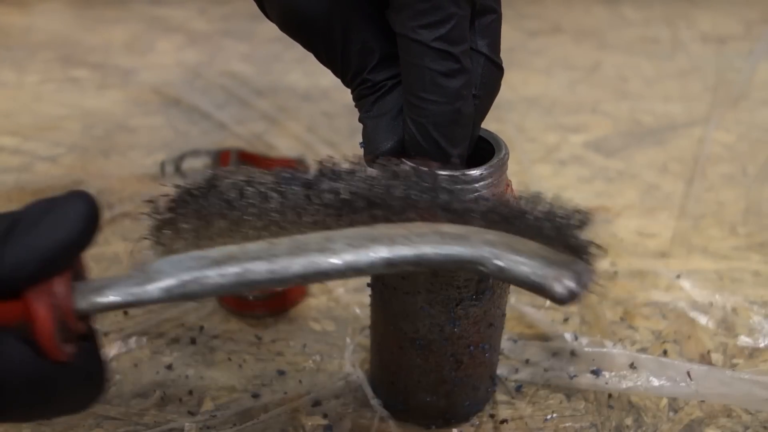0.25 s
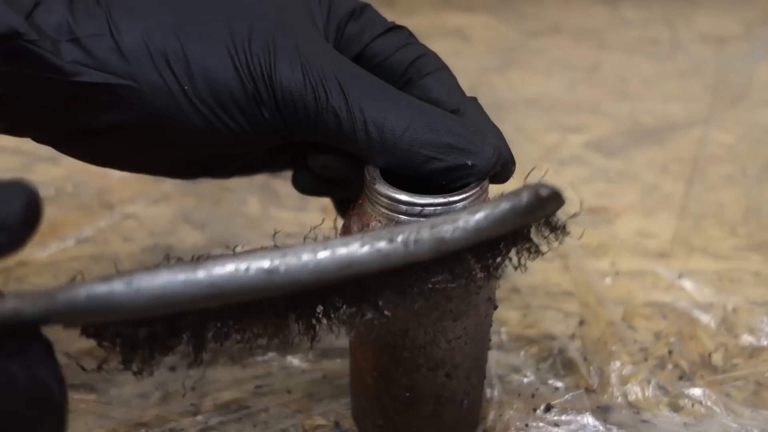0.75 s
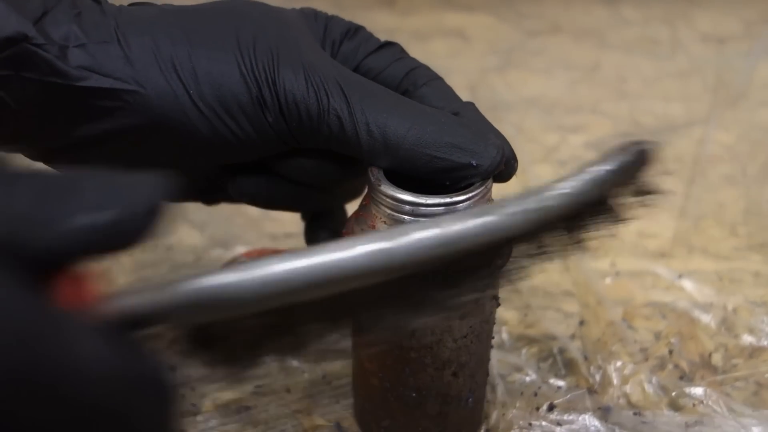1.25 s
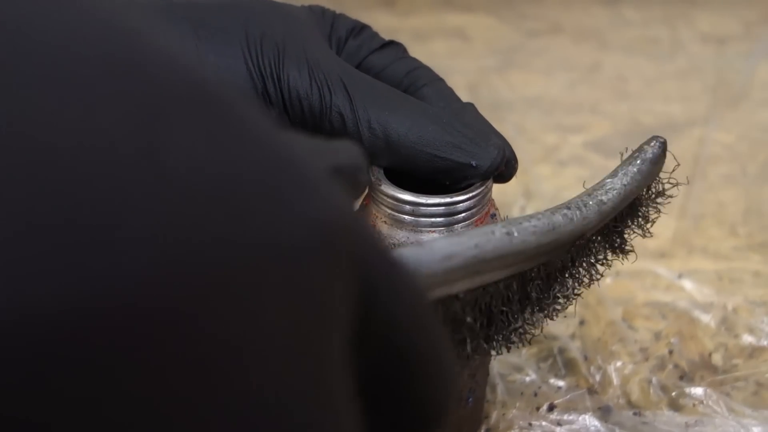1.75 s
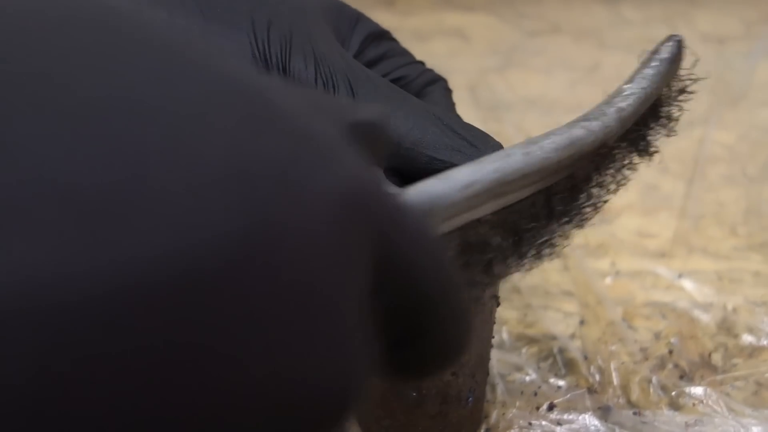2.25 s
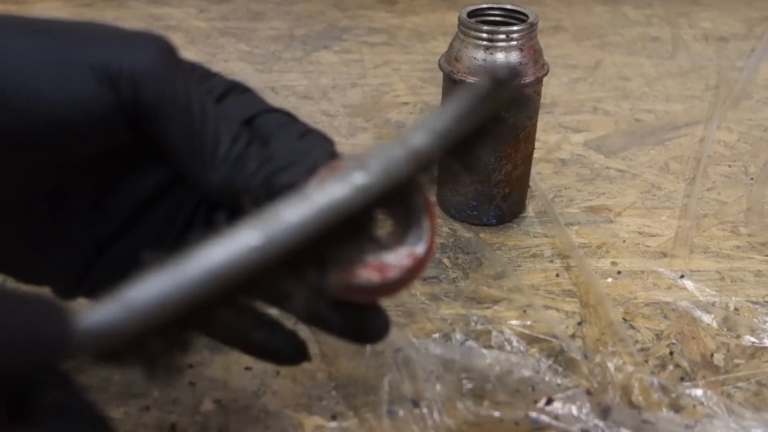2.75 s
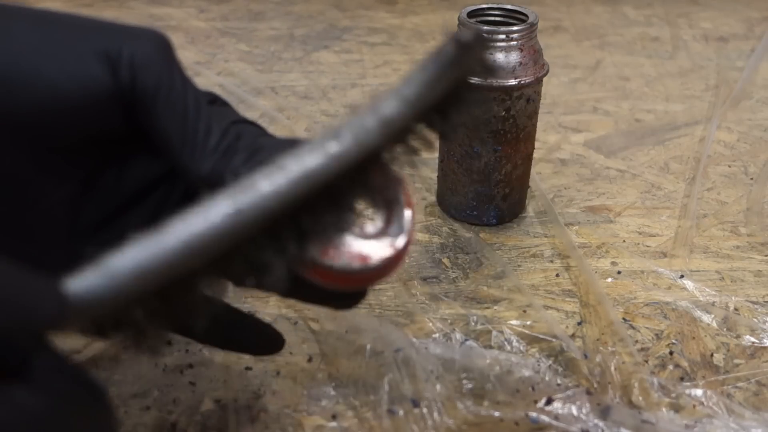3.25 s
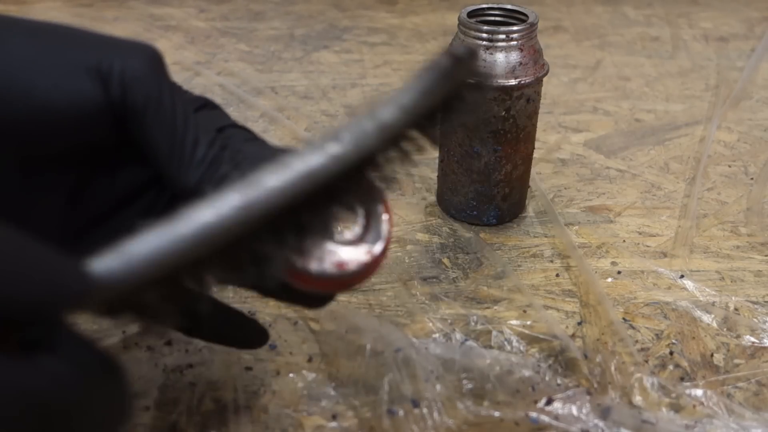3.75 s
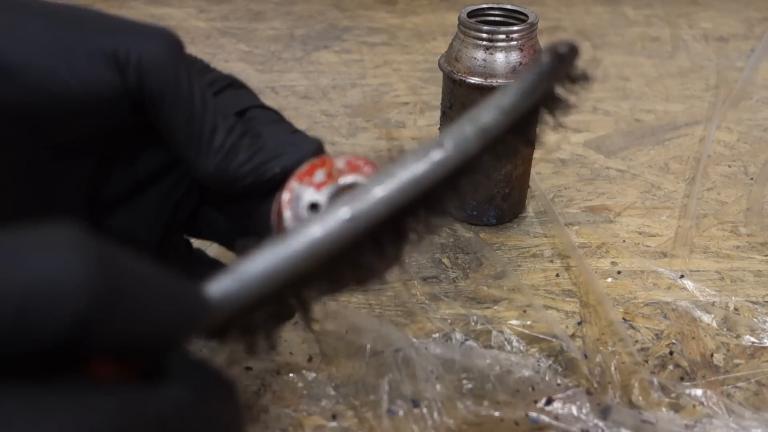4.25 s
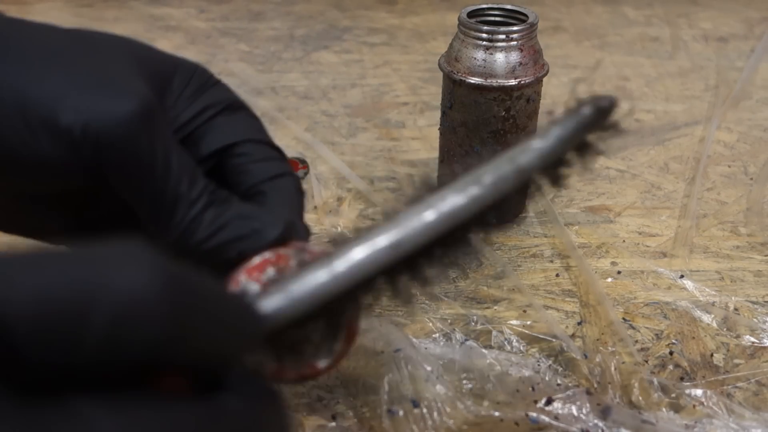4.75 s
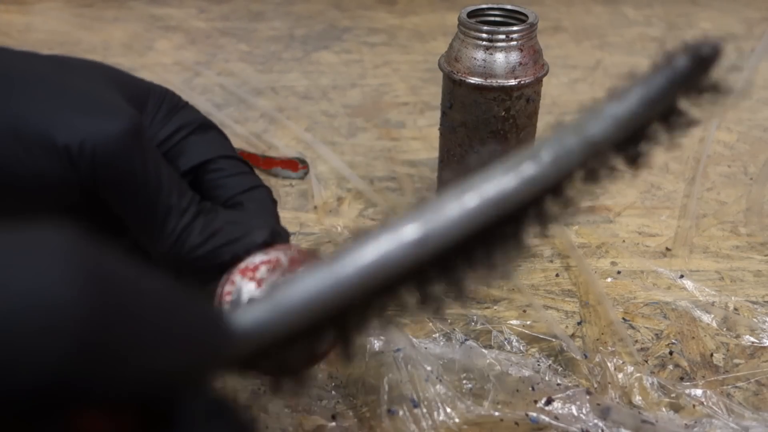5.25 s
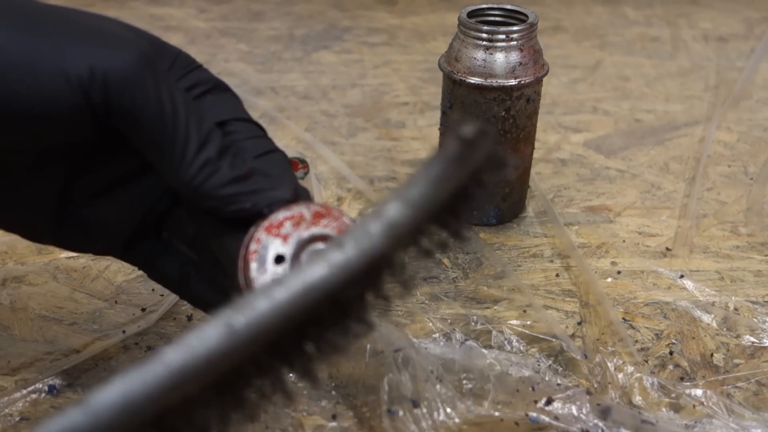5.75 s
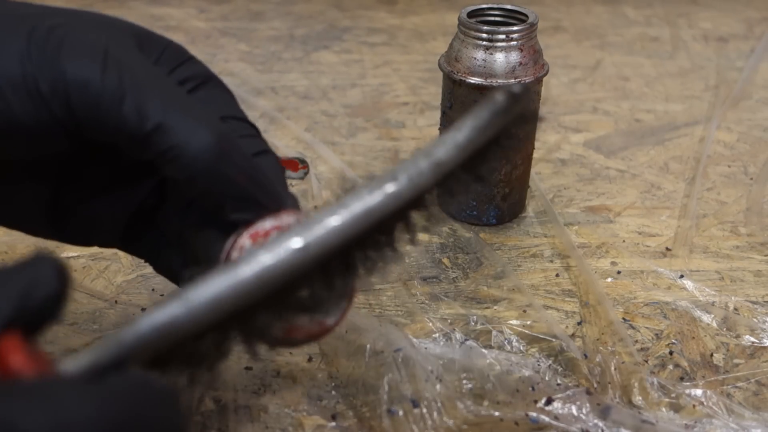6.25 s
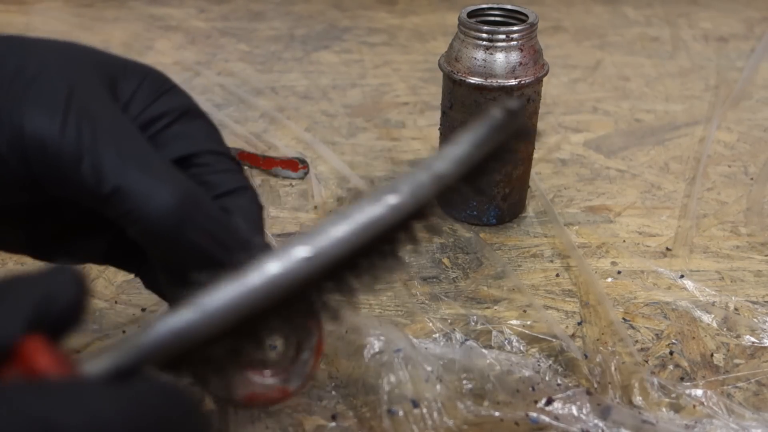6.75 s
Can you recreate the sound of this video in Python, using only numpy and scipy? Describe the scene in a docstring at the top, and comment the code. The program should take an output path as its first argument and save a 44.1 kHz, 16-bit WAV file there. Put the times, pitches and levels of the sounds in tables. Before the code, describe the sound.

In a small workshop, a wire brush scrubs a small steel can on a wooden bench with quick back-and-forth rasps, metallic ringing and light wooden drumming. A hard cut leads to the gloved cap: higher, drier scratches, some slower, a pause, then more strokes. At the very end a drill's wire wheel bites metal. Close stereo microphones, faint hiss.

```python
"""A hand wire brush scrubs a small steel can that stands on a wooden bench, then its loose cap held in a glove.
Wires snap free at random moments in thousands; the snaps sound directly and ring banks of steel resonances.
Single wires that catch hard add pinged blips and knocks. At the very end a drill's wire wheel bites into metal:
dense snaps pulsing once a turn. A small workshop answers with decaying noise tails; the microphones hiss faintly."""
import sys
import numpy as np
from scipy import signal
from scipy.fft import rfft, irfft, next_fast_len
from scipy.io import wavfile
from scipy.ndimage import uniform_filter1d, map_coordinates

SR = 44100
rng = np.random.default_rng(int(sys.argv[2]) if len(sys.argv) > 2 else 0)


def store_pcm(level_fs):
    """Save levels as 16-bit WAV."""
    pcm = np.round(np.clip(level_fs, -1, 1) * 32767).astype(np.int16)
    wavfile.write(sys.argv[1], SR, np.atleast_2d(pcm).T)


N = 308690


def can():
    """Snaps sound directly, ring the can's wall and drum through its foot on the bench."""
    # Brush strokes. Each row: start in seconds, length in seconds, relative scratch level in dB,
    # moment of full speed (0-1 of the stroke), wall ring share in dB, bench share in dB.
    can_strokes = [(.095, 0.14, -54.5, 0, 2.5, -8), (.165, 0.14, -40, 0.3, 7.5, -10.5),
                   (.355, .055, -52, 0.44, 1, 9), (.41, .125, -42, 0.5, 10, -4),
                   (.544, 0.15, -33, 0.29, 5, -10.5), (.7, .14, -34, 0.47, 9.5, -8),
                   (.841, 0.13, -32, 0.12, 8, -8), (.985, 0.11, -32.5, 0.47, 10.5, -8.5),
                   (1.105, 0.14, -32, 0.15, 7.5, -7.5), (1.26, 0.12, -34, 0.82, 7.5, -5.5),
                   (1.385, .15, -34, 0.15, 5, -10), (1.545, 0.13, -35.5, 0.67, 4, -7),
                   (1.688, 0.13, -33.5, 0.35, 1, -8.5), (1.835, 0.14, -38, 0.24, 1.5, -12),
                   (1.98, 0.055, -44.5, 0.3, 10.5, -13), (2.045, 0.12, -40, 0.29, 16, -7.5),
                   (2.14, .13, -37.5, 0.43, 8.5, -6.5), (2.28, 0.14, -39, 0.28, 10, -6),
                   (2.42, .11, -36.5, 0.57, 11, -6), (2.53, 0.13, -38.5, 0.63, 8, -10.5)]
    # Scratch spectrum. Each row: frequency in Hz, relative density in dB.
    scratch_spectrum = [(800, -23), (2000, -3), (4000, -2.5), (6500, -1), (9000, -3.5), (11500, 0.5),
                        (12500, -3), (14300, 4.5), (15700, -5.5)]
    # Wall modes in families. Each row: frequency in Hz, nominal width in Hz, relative level in dB.
    wall_modes = [
        [(2300, 90, -10), (2420, 250, -14), (2989, 30, -8), (3200, 250, -18), (4230, 300, -17)],
        [(5037, 45, 4), (5110, 180, -6), (10638, 60, 3), (10580, 350, -7), (10810, 60, -4)],
        [(5390, 300, -9), (5487, 45, -3), (5566, 55, -2), (7240, 300, -13), (7930, 60, -12)],
        [(9768, 60, -7), (9998, 90, -6), (10250, 600, -11), (11400, 120, -14)],
        [(12976, 80, -11), (13276, 70, -8), (13829, 80, -10), (14900, 420, -4), (14955, 80, -4),
         (15200, 200, -9)],
    ]
    # Each row, one per family: gain in dB, how far it follows the grip that frees or damps the steel (0-1).
    wall_grip = [(17.5, 0.55), (15, 1), (17, 0.96), (20, 0.74), (13, 0.81)]
    # Board modes. Each row: frequency in Hz, nominal width in Hz, relative level in dB.
    bench_modes = [(131, 79, -18.5), (244, 106, -7), (386, 146, -4.5), (656, 530, -4.5), (898, 146, -3.5),
                   (1297, 130, -6)]

    force, (ring, drum) = strokes(can_strokes, turn_db=(-7.5, -11.5), drift_db=(-3, 3.5), bend=0.73)
    blips, blows, knocks = snags(0, 2.66)

    snaps = wires(3000, spread_db=2.5, clump_db=1.5, rub=0.37)
    scratch = filtered(amp(6) * force * snaps, colour(scratch_spectrum))
    scratch = patchy(scratch, depth_db=1.5)

    wall = ringing(force, ring, amp(9.5) * blows, wall_modes, wall_grip, clump_db=4.0)

    thuds = drum * force * wires(600, spread_db=1.5, clump_db=2.5, rub=0.73)
    board = filtered(amp(20.5) * thuds + amp(32.0) * knocks, body(bench_modes))
    return scratch + amp(2) * blips + wall + board


def cap():
    """The cap rings short and high; the glove keeps the bass off the bench. Late on the brush works its edge."""
    # Brush strokes. Each row: start in seconds, length in seconds, relative scratch level in dB,
    # moment of full speed (0-1 of the stroke), ring share in dB, wire-shank scrape share in dB.
    cap_strokes = [(2.654, 0.13, -36.5, 0.79, 15, -1.5), (2.795, 0.13, -35.5, .35, 17, 1),
                   (2.955, 0.1, -38, 0.4, 13, 1.5), (3.075, 0.14, -37, 0.16, 10.5, 3),
                   (3.215, 0.097, -38.5, 0.27, 9.5, 4), (3.318, 0.11, -37, 0.27, 8.5, 2.5),
                   (3.445, 0.11, -40, 0.23, 8.5, 4.5), (3.552, 0.12, -37, 0.38, 14, 2),
                   (3.69, 0.11, -37, 0.36, 14.5, 0.5), (3.795, 0.15, -34.5, 0.21, 14, 1.5),
                   (3.94, 0.15, -36.5, 0.09, 12, 3), (4.296, .19, -38.5, 0.47, 13.5, 2.5),
                   (4.655, 0.17, -34.5, 0.28, 14, 0), (4.99, 0.15, -40, 0.37, 5, 5.5),
                   (6.01, 0.064, -56, 0.2, -6, -1.5), (6.085, .07, -37, .75, -1, -7.5),
                   (6.157, 0.14, -37.5, 0.07, 14.5, -5), (6.31, 0.13, -41, 0.38, 18, -3.5),
                   (6.435, 0.19, -43, 0.08, 9.5, 4), (6.6, .12, -41, 0.34, 15, -0.5),
                   (6.73, 0.22, -44, 0.1, 6, 6), (6.875, 0.066, -39, 0.86, 17, 1.5)]
    # Scratch spectrum. Each row: frequency in Hz, relative density in dB.
    scratch_spectrum = [(3000, -40.5), (5500, -1), (8500, 0), (11000, 1.5), (13200, 4), (14400, -2),
                        (16000, 1)]
    # Glove-damped modes in families. Each row: frequency in Hz, nominal width in Hz, relative level in dB.
    rim_modes = [
        [(5700, 300, -6), (5900, 60, 0), (6040, 55, -3), (6148, 80, -4), (6400, 400, -6)],
        [(6690, 160, -4), (6880, 200, -4), (7088, 90, 0), (7300, 200, -3), (7470, 200, -4)],
        [(12100, 800, -14), (12600, 400, -12), (13000, 260, -11)],
    ]
    # Each row, one per family: gain in dB, how far it follows the grip that frees or damps the steel (0-1).
    rim_grip = [(11, 0.87), (11, 0.93), (11, 0.83)]
    # Shank scrape spectra, on the face and on the edge. Each row: frequency in Hz, relative density in dB.
    shank_spectra = [(59, -72), (100, -41), (423, -23.5), (601, -26.5), (786, -14.5), (1140, -21),
                     (2860, -6.5), (4890, -6), (5500, -5.5), (7150, -11.5), (12100, -120)], [(59, -65),
                     (100, -41), (389, -25.5), (591, -27), (800, -18.5), (1730, -11.5), (1940, -18),
                     (3380, -5.5), (4890, -10), (5500, -6.5), (7150, -11), (12100, -120)]
    turn_to_edge_s = 5.6

    force, (ring, scrape) = strokes(cap_strokes, turn_db=(-17, -21), drift_db=(-4, 5.5), bend=0.66)
    blips, blows, knocks = snags(2.66, 7)

    snaps = force * wires(3000, spread_db=5, clump_db=2.0, rub=0.63)
    scratch = filtered(amp(8) * snaps, colour(scratch_spectrum))
    scratch = patchy(scratch, depth_db=4.0)

    rim = ringing(force, ring, amp(13) * blows, rim_modes, rim_grip, clump_db=1.5)

    on_edge = np.arange(N) / SR > turn_to_edge_s
    face = filtered(scrape * snaps * ~on_edge, colour(shank_spectra[0]))
    edge = filtered(amp(2.0) * scrape * snaps * on_edge, colour(shank_spectra[1]))

    knock = filtered(amp(28.0) * knocks, body([(740, 720, 0)]))
    return scratch + amp(5.0) * blips + rim + face + edge + knock


def strokes(rows, turn_db, drift_db, bend):
    """Brush force and two shares; each stroke swells to full speed and sinks again to where the hand turns.

    turn_db: scratch under full speed at the start and at the end of a stroke.
    drift_db: change of each share over a stroke; the ring leads, the low scrape or drum follows.
    """
    t_s, force, shares = np.arange(N) / SR, np.zeros(N), np.zeros((2, N))
    for start_s, length_s, db, crest, *shares_db in rows:
        inside = slice(round(start_s * SR), round((start_s + length_s) * SR))
        progress = (t_s[inside] - start_s) / length_s
        crest = np.clip(crest, .05, .95)
        rise, fall = progress / crest, (1 - progress) / (1 - crest)
        speed = np.sin(np.pi / 2 * np.clip(np.minimum(rise, fall), 0, 1)) ** bend
        force[inside] = amp(db + np.where(progress < crest, *turn_db) * (1 - speed))
        shares[:, inside] = amp(np.array(shares_db)[:, None] + np.outer(drift_db, progress - .5))
    return force, shares


def snags(start_s, end_s):
    """The hard catches in a span: a pinged blip with treble spit, the blow on the steel, the knock under it."""
    # Each row: time in seconds, relative level in dB, pitch in Hz, knock over that level in dB.
    catches = [(0.101, -31.5, 5300, -16), (0.179, -22.5, 5300, -15), (.3615, -34, 6240, -12),
               (.5461, -26, 7400, -23), (0.5841, -16, 5460, -27), (.668, -22, 6500, -9),
               (.7903, -16, 5350, -14), (.8444, -14.5, 5400, -32), (.991, -14, 5140, -22),
               (1.0783, -12.5, 5250, -9.5), (1.111, -10.5, 5330, -20), (1.122, -8.5, 5140, -17),
               (1.344, -11, 5400, -19), (1.353, -16, 5160, -11), (1.402, -16.5, 5350, -12),
               (1.4158, -12, 5470, -20), (1.4768, -23, 7500, -9), (1.6945, -18, 6600, -7.5),
               (2.056, -27, 5000, -19), (2.315, -16.5, 5400, -25), (2.3718, -18.5, 5340, -14),
               (2.4344, -15, 5240, -19), (2.8404, -18, 7300, -17), (2.851, -14.5, 6350, -43),
               (2.8704, -21, 7200, -34), (2.9607, -22.5, 7330, -36), (3.078, -31, 7200, -28),
               (3.2182, -21, 7000, -37), (3.5593, -24, 7100, -26), (3.8156, -18.5, 7100, -33),
               (3.8299, -17, 5800, -48), (3.8545, -10.5, 5820, -29), (4.0416, -25, 6950, -15),
               (4.2916, -19, 7070, -8), (4.298, -22, 6700, -20), (4.668, -13.5, 5870, -29),
               (4.6938, -16, 7000, -23), (4.9927, -30.5, 5700, -8.5), (5.0157, -20.5, 5470, -33),
               (5.046, -15.5, 5940, -52), (5.0607, -24, 6800, -46), (5.4928, -53, 4000, -28),
               (5.5503, -44, 3600, -17), (6.0218, -47, 6200, -5), (6.041, -46.5, 3450, -4),
               (6.1006, -33, 6040, -26), (6.12, -24, 6000, -40), (6.1376, -18.5, 5980, -35),
               (6.1663, -15, 7100, -25), (6.1778, -15.5, 5920, -46), (6.2305, -17, 6100, -24),
               (6.3487, -18, 5620, -38), (6.5525, -28, 5850, -30), (6.666, -28, 6800, -32),
               (6.7955, -25, 5930, -24), (6.866, -26.5, 4100, -29)]
    spit_db, spit_scatter_db = -16, 2.5  # relative to the catch
    length = 160  # samples
    blips, blows, knocks = np.zeros((3, N))
    t_s = np.arange(length) / SR
    shape = np.exp(-t_s / 0.00075) * (1 - np.exp(-t_s / 0.00035)) * 2.68
    noises = rng.standard_normal((len(catches), length + 3))
    for (catch_s, db, hz, knock_db), noise in zip(catches, noises):
        if start_s <= catch_s < end_s:
            at = round(catch_s * SR)
            ping = np.sin(2 * np.pi * hz * t_s)
            grit = 0.29 * np.diff(noise)[:length]
            spit = amp(spit_db + spit_scatter_db * noise[-1]) * np.diff(noise[:-1], 2)
            blips[at:][:length] += amp(db) * shape * (ping + grit + spit)
            blows[at] = amp(db)
            knocks[at] = amp(db + knock_db)
    return blips, blows, knocks


def wires(per_second, spread_db, clump_db, rub):
    """Wires snapping free at random moments, a few much harder than most, in clumps, over a steady rub."""
    chance, sign, hardness = rng.random((3, N))
    strength = amp(-spread_db * np.log(hardness + .01))
    snaps = (chance < per_second / SR) * np.sign(sign - .5) * strength
    clumps = amp(clump_db * wobble(90) + 0.57 * clump_db * wobble(25))
    return unit(clumps * (unit(snaps) + rub * rng.standard_normal(N)))


def ringing(force, ring, blows, families, grip, clump_db):
    """Each family of modes answers to its own wires, so the ring jumps from pitch to pitch."""
    total = np.zeros(N)
    for modes, (db, share) in zip(families, grip):
        snaps = wires(1200, spread_db=4.5, clump_db=clump_db, rub=0.74)
        drive = force * ring ** share * snaps + blows
        total += filtered(amp(db) * drive, body(modes))
    return total


def patchy(x, depth_db):
    """Bright and dull patches that come and go as other tufts of wire touch."""
    z = signal.stft(x, nperseg=256)[2]
    field = uniform_filter1d(rng.standard_normal(z.shape), size=7, axis=0)  # over frequency
    field = uniform_filter1d(field, size=12, axis=1)  # over time
    return signal.istft(z * amp(depth_db * unit(field)), nperseg=256)[1][:N]


def wheel():
    """The drill's wire wheel runs slightly out of true, so it bites harder once a turn."""
    # Contact with the metal. Each row: time in seconds, relative level in dB.
    contact = [(6.921, -34), (6.933, -14.5), (6.946, -23), (7.0, -17.5)]
    # Each row: frequency in Hz, relative density in dB.
    wheel_spectrum = [(35, -70), (60, -51), (398, -12.5), (715, -9.5), (924, -4), (1060, 1.5), (1410, 3.5),
                      (5590, -3.5), (7060, -3.5), (11000, -4), (16000, -11.5)]
    turns_per_s = 89.4
    t_s = np.arange(N) / SR
    contact_s, contact_db = np.transpose(contact)
    pressure_db = np.interp(t_s, contact_s, contact_db, left=-150)
    wobble_db = 2.1 * np.cos(2 * np.pi * turns_per_s * (t_s - 6.964))
    snaps = wires(6000, spread_db=2.0, clump_db=-0.3, rub=0.35)
    return filtered(amp(pressure_db + wobble_db) * snaps, colour(wheel_spectrum))


def amp(db):
    """Amplitude ratio of a level in dB."""
    return 10 ** (np.asarray(db) / 20)


def unit(x):
    """x scaled to an RMS of one."""
    return x / np.sqrt(np.mean(x ** 2) + 1e-20)


def along(points, hz):
    """Interpolates (Hz, value) points on a log frequency axis."""
    f, v = np.transpose(points)
    return np.interp(np.log(hz + 1), np.log(f + 1), v)


def wobble(knots_per_s):
    """A smooth random curve through random knots."""
    knots = rng.standard_normal(int(N * knots_per_s / SR) + 4)
    return map_coordinates(knots, [np.arange(N) * knots_per_s / SR])


def filtered(x, response):
    """x times a complex response of frequency."""
    m = next_fast_len(N + SR // 2)
    return irfft(rfft(x, m) * response(np.fft.rfftfreq(m, 1 / SR)), m)[..., :N]


def causal(gain):
    """The response with this gain over frequency whose energy comes as early as it can (folded cepstrum)."""
    size = 2 ** 15
    cepstrum = irfft(np.log(gain(np.fft.rfftfreq(size, 1 / SR)) + 1e-6))
    cepstrum[1:size // 2] *= 2
    cepstrum[size // 2 + 1:] = 0
    pulse = irfft(np.exp(rfft(cepstrum)))
    return lambda hz: rfft(pulse, 2 * len(hz) - 2)


def colour(points):
    """A response of unit energy with the given spectrum."""
    return causal(lambda hz: unit(amp(along(points, hz))))


def body(modes):
    """Resonances whose powers add; steep skirts keep the valleys between them dark."""
    def gain(f):
        power = 0
        for hz, width_hz, db in modes:
            damping = (f * width_hz) ** 2
            peak = damping / ((hz * hz - f * f) ** 2 + damping)
            power = power + amp(2 * db) * peak ** 1.6  # exponent steepens the skirts
        return np.sqrt(power)
    return causal(gain)


def placed(x, pan_db, until_s):
    """Direct sound and the room's answer in stereo, both stopped dead at the given moment."""
    x = filtered(x, lambda hz: (1j * hz / (1j * hz + 90)) ** 2)  # the deep bass falls away below about 90 Hz
    direct = amp(-3.0) * x * amp([[pan_db], [-pan_db]])
    heard = direct + amp(-6.5) * shop(x)
    return heard * np.clip((until_s - np.arange(N) / SR) / 0.0051, 0, 1)


def shop(x):
    """Workshop answer: each frequency dies at its own speed; bass arrives nearly alike on both sides."""
    # Each row: frequency in Hz, time to decay by 60 dB in seconds.
    decay = [(200, 0.8), (1000, 0.42), (4000, 0.33), (7000, 0.31), (10000, 0.24), (16000, 0.17)]
    # Each row: frequency in Hz, side over mid as a ratio.
    side_ratio = [(100, 0.16), (500, 0.16), (2000, 0.64), (8000, 0.6)]
    wet, step = np.zeros((2, N + SR)), SR // 4
    for start in range(0, N, step):  # the tail is drawn anew for each step
        if np.abs(x[start:start + step]).max() < 1e-5:
            continue
        hz, t_s, z = signal.stft(rng.standard_normal((2, SR // 2)), SR, nperseg=256)
        z = z * amp(-60 * t_s / along(decay, hz)[:, None])
        z[1] *= along(side_ratio, hz)[:, None]
        mid, side = signal.istft(z, SR, nperseg=256)[1]
        tail = np.array([mid + side, mid - side]) / np.linalg.norm(mid)
        part = signal.fftconvolve(x[None, start:start + step], tail, axes=1)
        wet[:, start + 100:][:, :part.shape[1]] += part  # 100 samples of delay
    return wet[:, :N]


def hiss():
    """Self-noise of the two microphone capsules, independent on each side."""
    # Each row: frequency in Hz, relative density in dB.
    hiss_spectrum = [(25, -24), (100, -15), (200, -5), (300, 0), (1200, -1), (1450, -4), (2000, 0),
                     (4000, 2), (7500, 1), (14000, -6), (16000, -8)]
    level_db = -59
    return amp(level_db) * unit(filtered(rng.standard_normal((2, N)), colour(hiss_spectrum)))


def scene():
    """Can, cap and wheel in their places, over the hiss."""
    # When the sound stops dead, tail and all, in seconds: the can's, then the cap's.
    can_end_s, cap_end_s = [2.652, 6.926]
    brushed = placed(can(), -0.4, can_end_s) + placed(cap(), 0.43, cap_end_s)
    return brushed + placed(wheel(), -0.76, until_s=8) + hiss()  # 8 s lies past the end


def record(dry):
    """Nothing is kept above the band limit of 15750 Hz."""
    return filtered(dry, lambda hz: hz < 15750)


dry = scene()
out = record(dry)
store_pcm(out)
```